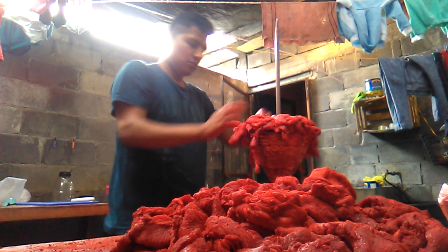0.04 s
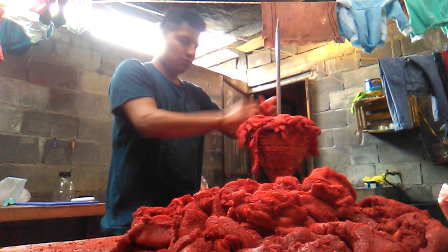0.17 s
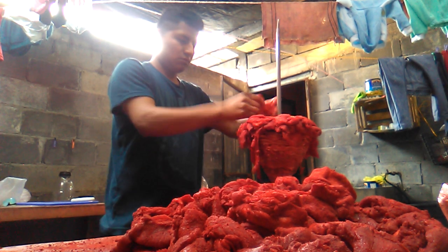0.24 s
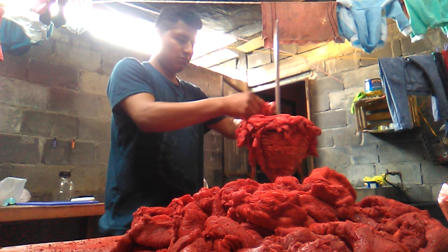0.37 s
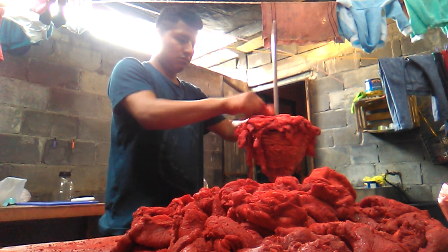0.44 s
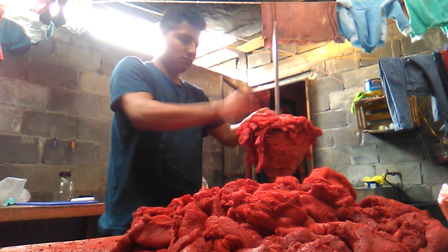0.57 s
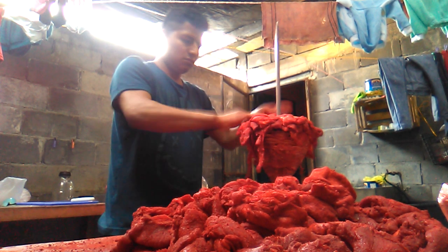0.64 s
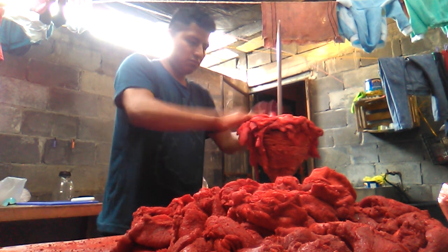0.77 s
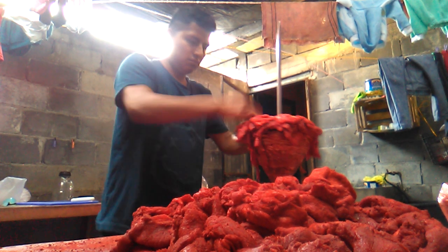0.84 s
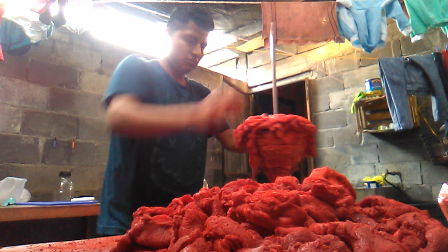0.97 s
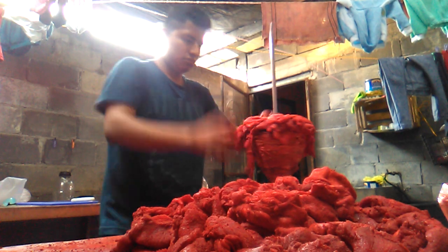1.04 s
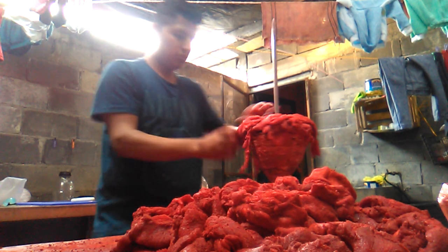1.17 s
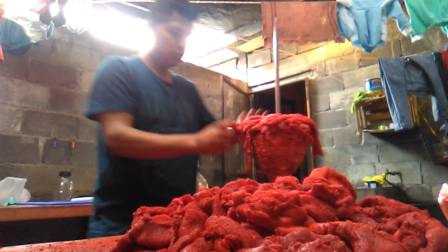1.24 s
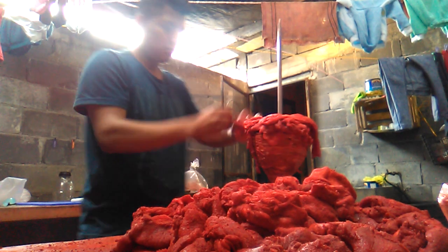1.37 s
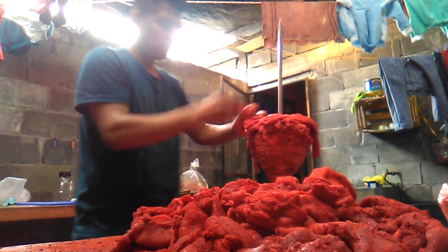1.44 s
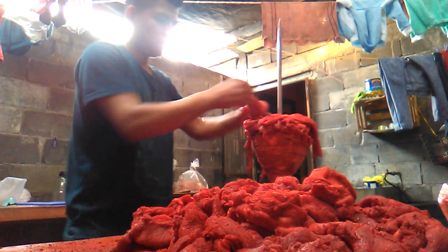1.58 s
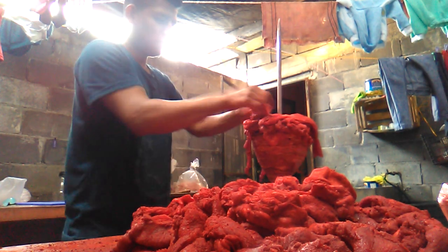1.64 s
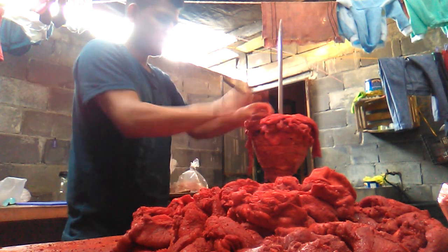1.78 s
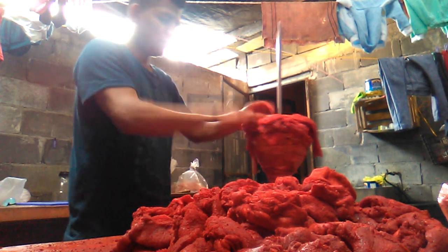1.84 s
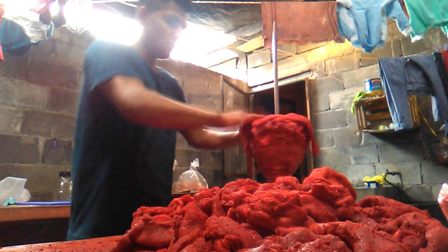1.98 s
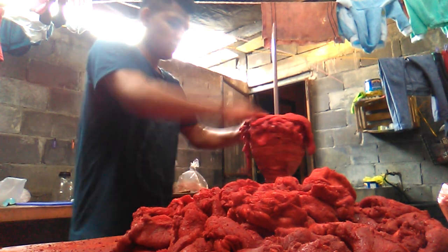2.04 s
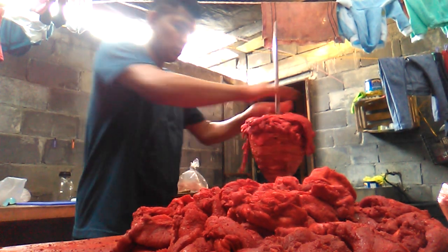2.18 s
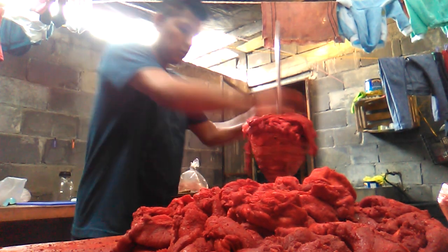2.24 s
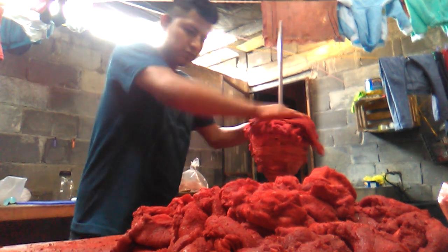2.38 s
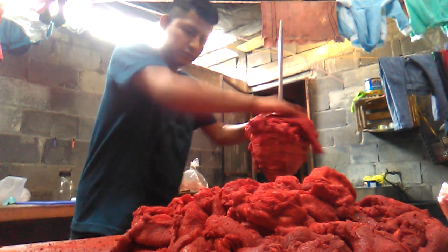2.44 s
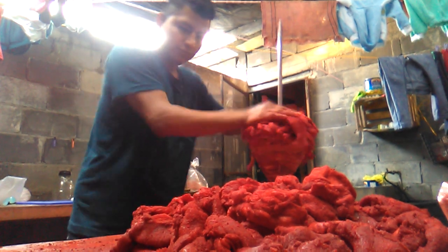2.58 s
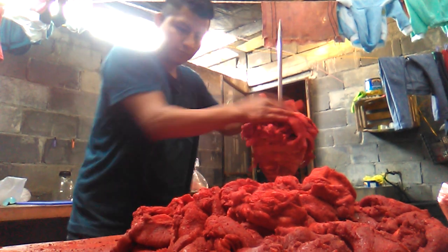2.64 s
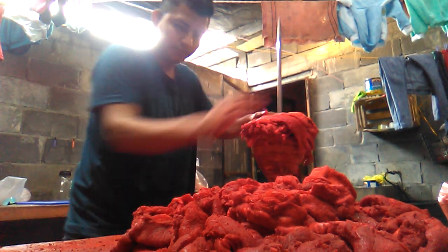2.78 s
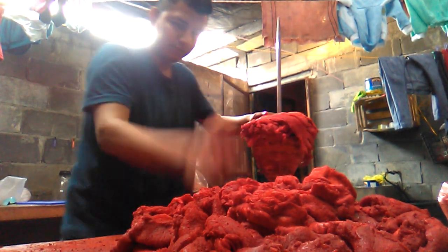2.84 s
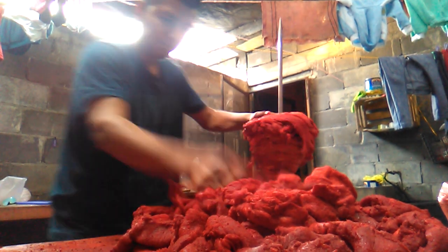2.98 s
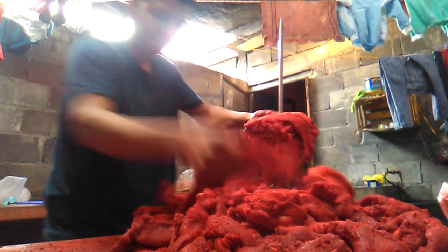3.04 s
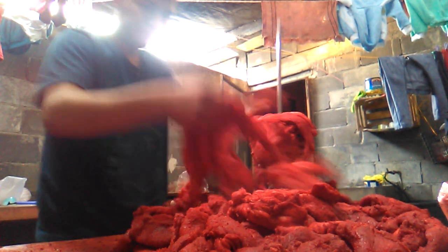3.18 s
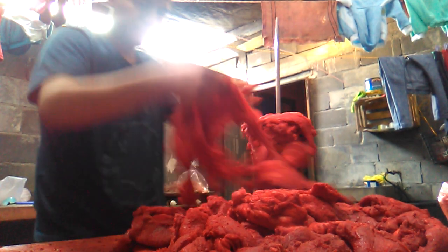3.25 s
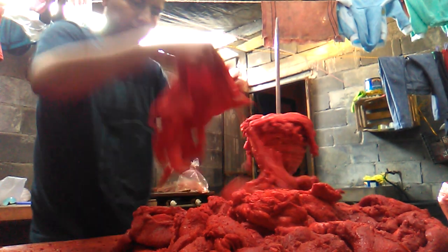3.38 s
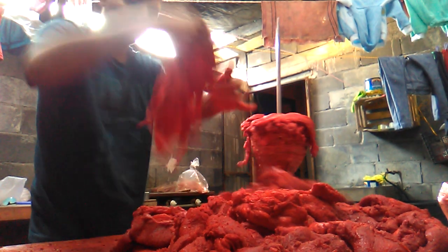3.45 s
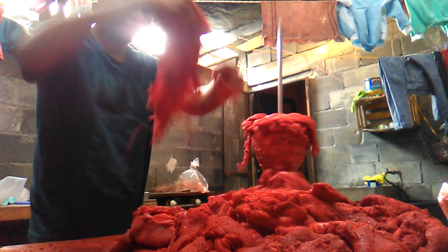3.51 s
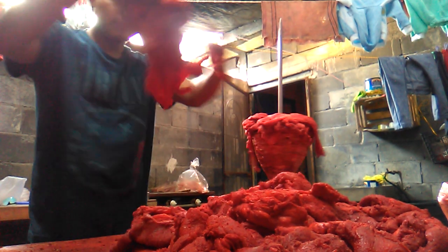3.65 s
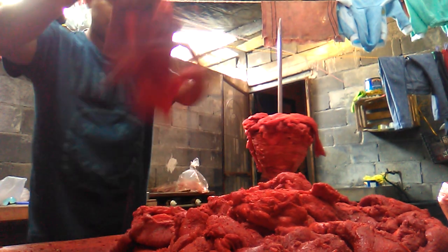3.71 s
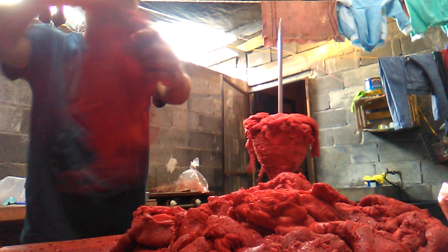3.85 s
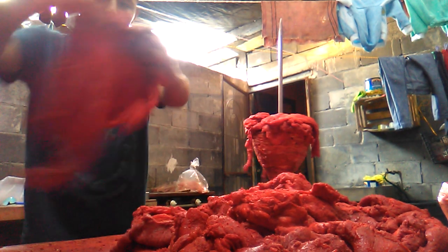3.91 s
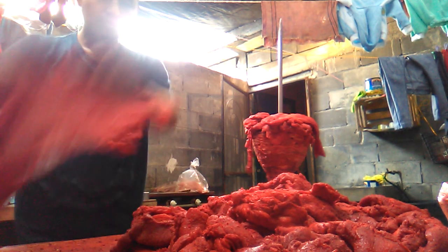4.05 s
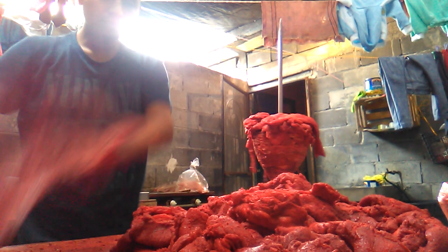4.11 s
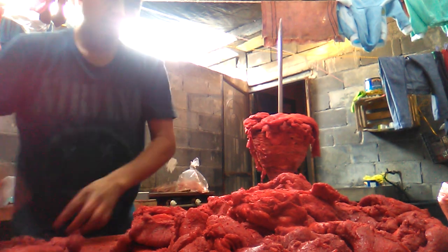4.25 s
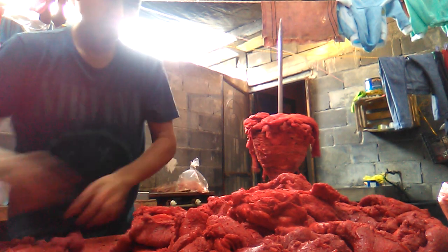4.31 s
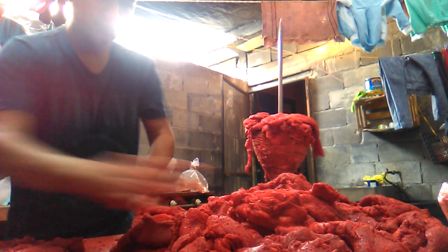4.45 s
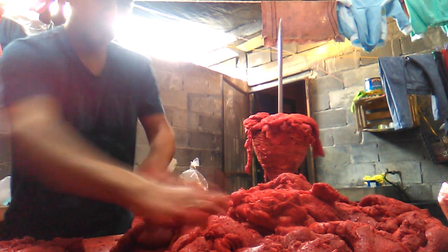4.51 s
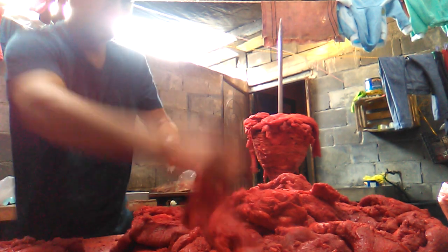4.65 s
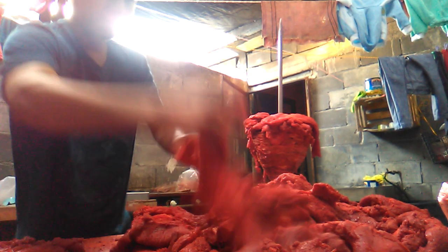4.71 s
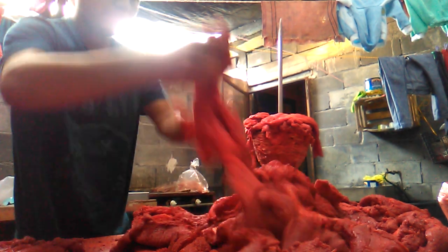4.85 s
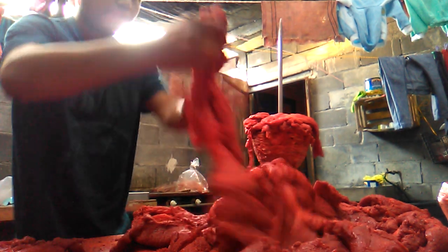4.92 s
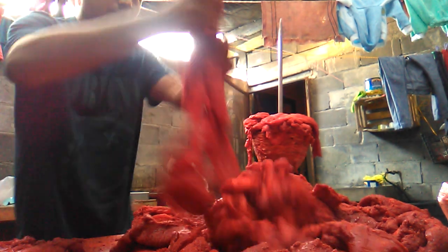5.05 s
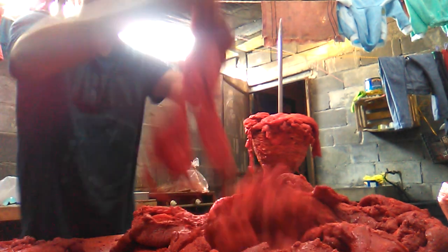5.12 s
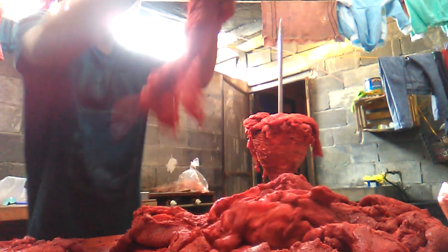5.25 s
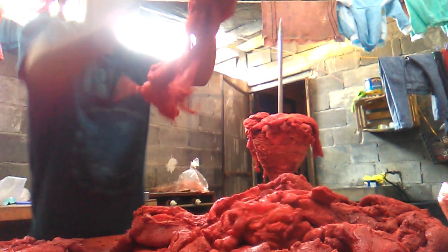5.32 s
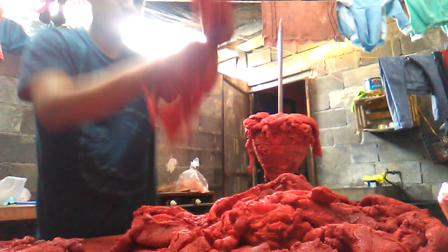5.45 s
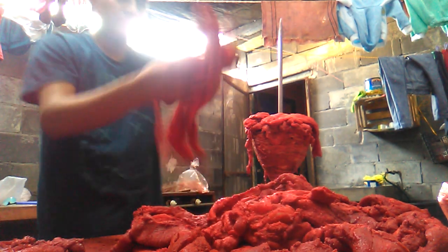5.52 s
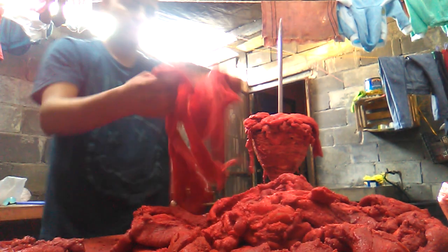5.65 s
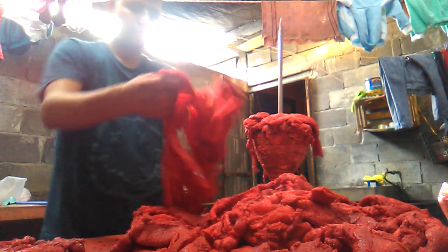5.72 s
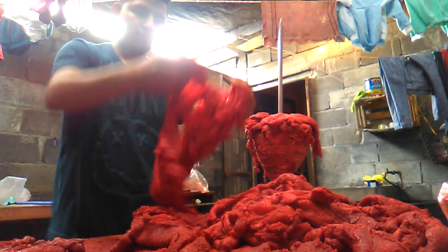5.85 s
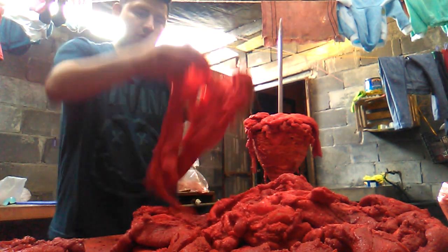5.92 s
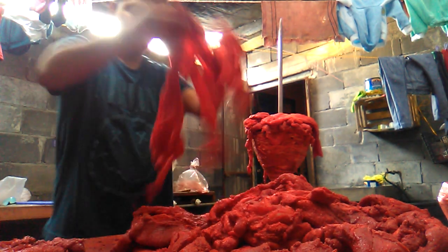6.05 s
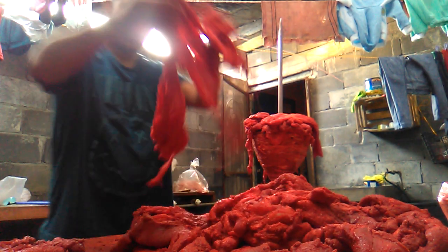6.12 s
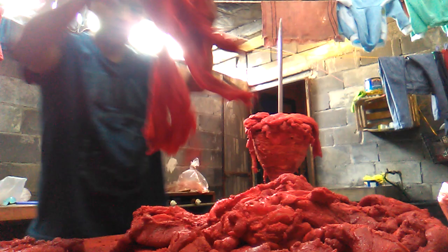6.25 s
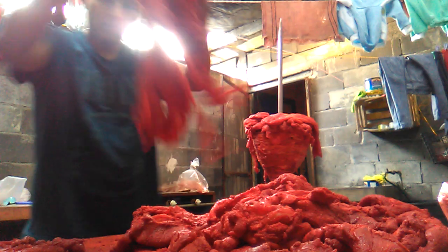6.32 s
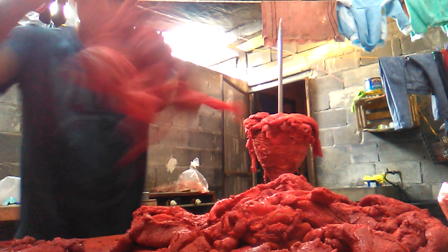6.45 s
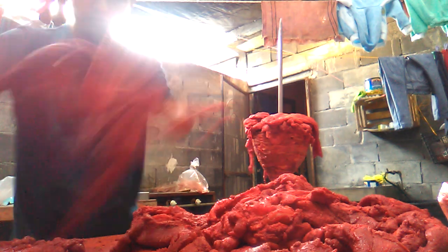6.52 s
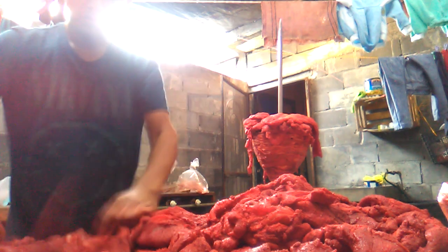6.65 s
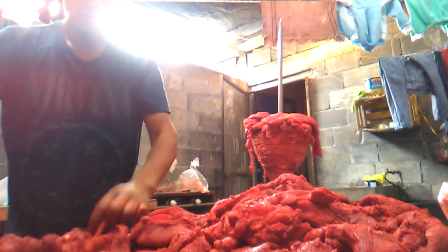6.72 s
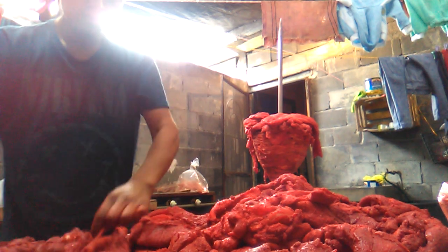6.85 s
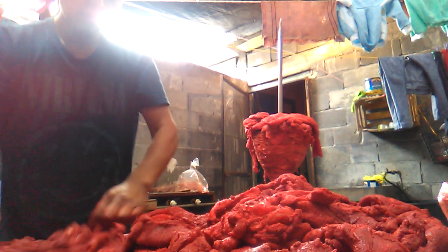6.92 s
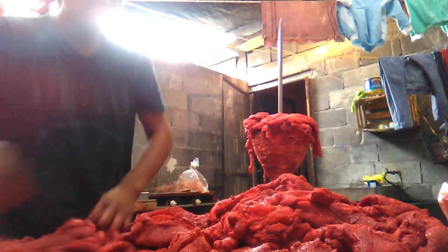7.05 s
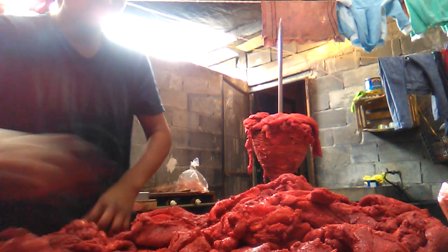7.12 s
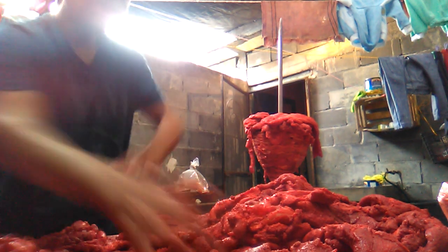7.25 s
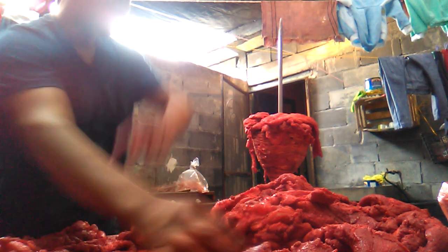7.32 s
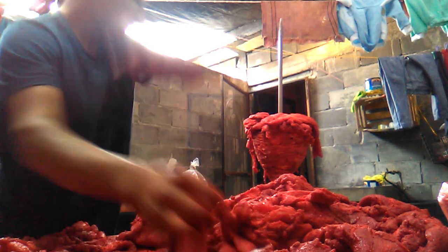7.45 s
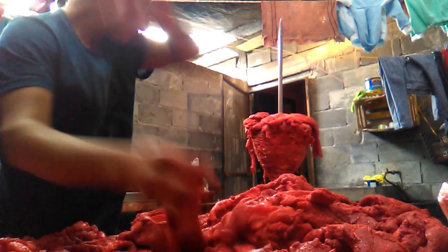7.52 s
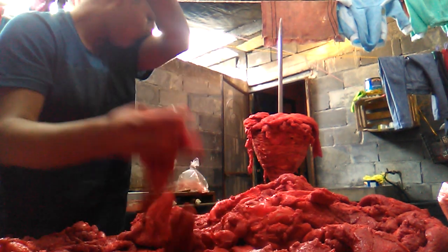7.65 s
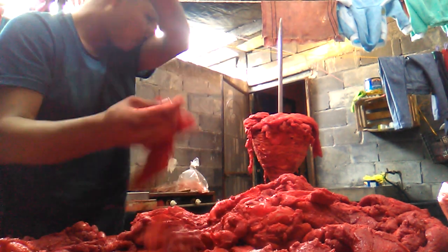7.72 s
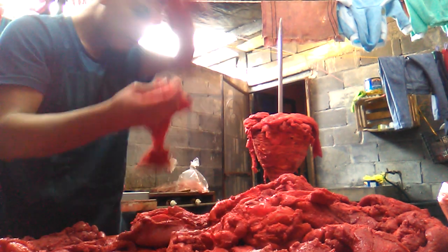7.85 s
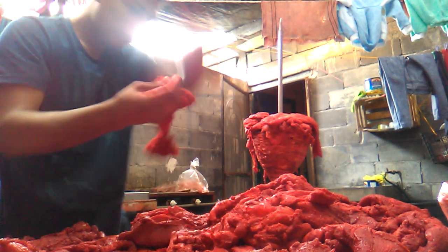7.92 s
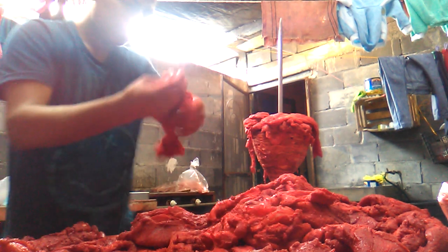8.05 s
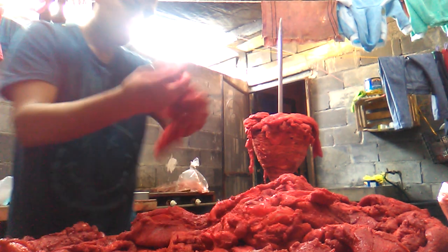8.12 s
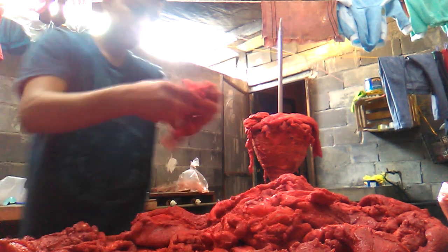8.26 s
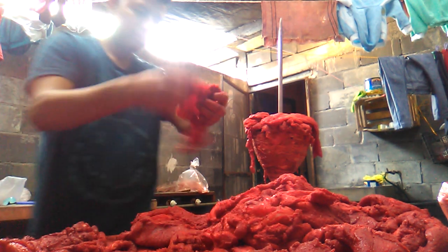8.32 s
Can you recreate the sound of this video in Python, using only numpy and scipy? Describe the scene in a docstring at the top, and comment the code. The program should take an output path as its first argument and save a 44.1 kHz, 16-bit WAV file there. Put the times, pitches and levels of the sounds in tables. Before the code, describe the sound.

Hands pat wet meat onto a metal spit, with one hollow smack, sticky peeling and two wet slaps in a small room.

```python
"""A small block-walled room where wet marinated meat is stacked on an upright spit.
Hands pat the stack, ringing the spit, and a cupped palm smacks it once with a hollow pop.
Slices peel crackling off a sticky heap; twice one is flung onto the table, forcing out air and juice.
Juice ticks and drips; a low outdoor rumble swells and sinks behind it all."""
import sys
import numpy as np
from scipy import signal
from scipy.fft import rfft, irfft
from scipy.io import wavfile

SR = 44100
rng = np.random.default_rng(int(sys.argv[2]) if len(sys.argv) > 2 else 0)


def persist_wave(psi):
    """Save psi, clipped to +-1, as 16-bit WAV."""
    counts = np.round(np.clip(psi, -1, 1) * 32767).astype(np.int16)
    wavfile.write(sys.argv[1], SR, np.atleast_2d(counts).T)


N = 369999
EDGE_HZ = 14350

# flung slices: t/s, loose-end lead/s, first end's splash/dB, step per end/dB, first fold gap/s,
# fold push/dB, push f/Hz, fold splash/dB, air pocket f/Hz, thud/dB, thud f/Hz, spatter/dB
SLAPS = [(4.2429, .0205, -43, -0.5, .0033, -12.5, 343.5, -22, 1320, -9.5, 131, -52),
         (6.691, 0.033, -37, -8, .0047, -10, 330, -27, 876, -21, 151, -49.5)]
# cupped palm: t/s, pop/dB, pop f/Hz, squirt/dB, squirt length/s
SMACK = [(2.327, -10, 472, -33, 0.002)]
# juice splash spectrum: f/Hz, level/dB
SPLASH = [(100, -14), (500, 5.5), (850, 1.5), (1300, 0.5), (1700, -1), (2500, -0.5), (3500, -5.5),
          (5500, -7), (7000, -13.5), (9000, -25.5), (14000, -38)]


def amp(db):
    """Decibels to gain."""
    return 10 ** (np.asarray(db) / 20)


def unit(x):
    """Scale to unit rms."""
    return x / np.sqrt(np.mean(x ** 2) + 1e-20)


def read(points, hz):
    """Interpolate a table over log frequency."""
    f, value = np.transpose(points)
    return np.interp(np.log(hz + 1), np.log(f), value)


def level(curve):
    """Gain per sample from (t/s, level/dB) points."""
    return amp(np.interp(np.arange(N) / SR, *np.transpose(curve)))


def swell(start_s, end_s, attack_s, release_s):
    """Gain that builds up to start_s, holds until end_s, then decays."""
    t = np.arange(N) / SR
    return np.exp(-np.maximum(start_s - t, 0) / attack_s - np.maximum(t - end_s, 0) / release_s)


def add(mix, at_s, sound):
    """Mix a sound in at a time."""
    part = mix[max(round(at_s * SR), 0):][:len(sound)]
    part += sound[:len(part)]


def colour(x, spectrum, size=4096):
    """Minimum-phase filter of unit energy with the given spectrum."""
    log_gain = np.log(amp(read(spectrum, abs(np.fft.fftfreq(size, 1 / SR)))))
    response = np.exp(np.conj(signal.hilbert(log_gain)))
    taps = np.fft.ifft(response).real[:size // 2]
    return signal.oaconvolve(x, taps / np.linalg.norm(taps))[:len(x)]


def drift(rate_hz):
    """Slow random wander, unit rms."""
    frames = N // 128 + 2
    f = np.fft.rfftfreq(frames, N / frames / SR)
    spectrum = rfft(rng.standard_normal(frames)) * np.exp(-(f / rate_hz) ** 2)
    return np.interp(np.arange(N), np.linspace(0, N, frames), unit(irfft(spectrum, frames)))


def grains(per_s, spread_db):
    """Random clicks, most small, a few large."""
    place, size, sign = rng.random((round(per_s * N / SR), 3)).T
    height = amp(spread_db * np.minimum(-np.log(1 - size), 4)) * np.sign(sign - .5)
    return unit(np.bincount((place * N).astype(int), height, N))


def push(hz, cycles):
    """Air displaced by a soft blow: a fast-decaying sine."""
    turns = hz * np.arange(SR // 8) / SR
    return np.sin(2 * np.pi * turns) * np.exp(-turns / cycles)


def spray(length_s):
    """Juice forced from a closing gap: a noise burst."""
    age = np.arange(SR // 8) / SR / length_s
    shape = 2 * age * np.exp(1 - 2 * age)
    return unit(rng.standard_normal(len(age)) * shape) * np.sqrt(np.mean(shape ** 2))


def slaps(cycles=.6, spray_s=.002, rush_hz=330, flap_hz=284, pocket_db=-2.5):
    """Loose ends touch first, the slice lands fold by fold, its weight thuds. Returns body, juice."""
    body, juice = np.zeros(N), np.zeros(N)
    slither = grains(per_s=3000, spread_db=1.5)
    rush = unit(signal.lfilter(*signal.butter(2, rush_hz, fs=SR), slither))
    for (s, lead_s, flap_splash_db, flap_step_db, gap_s, push_db, push_hz,
         splash_db, pocket_hz, thud_db, thud_hz, _) in SLAPS:
        # the hanging end slithers down, shoving air ahead
        approach = swell(s, s, .72 * lead_s, spray_s)
        body += amp(-32) * rush * approach
        juice += amp(-49.5) * slither * approach
        for k in range(3):  # each loose end heavier and lower, its splash longer
            touch_s = s - lead_s * (1 - k / 3)
            add(body, touch_s, amp(-31.5 + 4 * k) * push(flap_hz * .7 ** k, cycles))
            add(juice, touch_s, amp(flap_splash_db + k * flap_step_db) * spray(.00079 * 1.8 ** k))
        folds_s = s + gap_s * np.array([0, 1, 1.5])
        for fold_s, wet_db in zip(folds_s, (0, 4, 0)):
            add(body, fold_s, amp(push_db) * push(push_hz, cycles))
            add(juice, fold_s, amp(splash_db + wet_db) * spray(spray_s))
        # air trapped under the middle fold rings
        add(juice, folds_s[1], amp(splash_db + pocket_db) * push(pocket_hz, cycles=3.8))
        add(body, folds_s[-1], amp(thud_db) * push(thud_hz, cycles=.53))
    return body, colour(juice, SPLASH)


def smack(cavity_hz=(190, 780)):
    """A cupped palm traps air on the stack and squirts it out. Returns hollow pop, bright squirt."""
    # squirt spectrum: f/Hz, level/dB
    squirt_spectrum = [(500, 1), (1220, 1.5), (1600, -4.5), (2200, -27), (3000, -2.5), (3500, -13),
                       (4400, 1), (5200, 4.5), (5700, -11), (6100, -5.5), (7200, -19), (8700, -21),
                       (9700, -14), (14000, -41)]
    pop, juice = np.zeros(N), np.zeros(N)
    cavity = signal.butter(3, cavity_hz, "bandpass", fs=SR, output="sos")
    for s, pop_db, hz, squirt_db, length_s in SMACK:
        air = signal.sosfilt(cavity, push(hz, cycles=.68))
        add(pop, s - .001, amp(pop_db) * air)  # air leaves before the juice
        add(juice, s, amp(squirt_db) * spray(length_s))
    return pop, colour(juice, squirt_spectrum)


def pats(rise_s=.00064, thud_db=-1, wet_db=-19, wet_s=.0058, wet_top_hz=4200, detune=.032, spot_db=2.5):
    """Fingers thud on the meat and ring the spit, a little differently at each spot."""
    # finger blows: t/s, level/dB, tilt/(dB/octave), thud f/Hz
    blows = [(0.441, -48.5, -3.5, 243), (0.497, -49, -3.5, 400), (0.8467, -36.5, -0.5, 442),
             (0.985, -50.5, -2.5, 303), (1.187, -38, -2, 450), (1.348, -38, -0.5, 270),
             (1.855, -45.5, -2.5, 650), (1.9801, -45.5, -1, 1150), (2.0488, -32.5, 1, 315),
             (2.295, -40.5, -3.5, 390), (2.765, -34.5, -1, 393), (2.960, -41.5, -4.5, 372),
             (3.5602, -40.5, -4.5, 305), (6.937, -46.5, -8, 205)]
    # modes of the loaded spit and stand: f/Hz, level/dB, t60/s
    spit_modes = [(118, -8.5, 0.1), (184, 2, 0.025), (257, -11, 0.041), (409, -6, 0.064),
                  (495, -6.5, 0.079), (649, -11.5, 0.064), (890, -11, 0.032), (1082, -11, 0.024),
                  (1270, -37, 0.05), (1575, -25, 0.029), (1576, -15.5, 0.04), (2240, -29, 0.095),
                  (2490, -24, 0.056), (2600, -36, 0.043), (3210, -26, 0.06), (3275, -27.5, .05),
                  (3570, -60, .05)]
    hz, db, t60_s = np.transpose(spit_modes)[:, :, None]
    t = np.arange(SR // 8) / SR
    attack = 1 - np.exp(-t / rise_s)
    body, juice = np.zeros(N), np.zeros(N)
    for s, pat_db, tilt_db, thud_hz in blows:
        load, spot, phase = rng.standard_normal((3, len(spit_modes), 1))
        gain = amp(db + tilt_db * np.log2(hz / 400) + spot_db * np.tanh(spot) - 60 * t / t60_s)
        ring = (gain * np.sin(2 * np.pi * (hz * (1 + detune * load) * t + phase))).sum(0)
        thud = amp(thud_db) * push(thud_hz, cycles=1.76)
        add(body, s, amp(pat_db) * (ring + thud) * attack)
        add(juice, s - .001, amp(pat_db + wet_db + 2 * tilt_db) * spray(wet_s))  # wet film is met first
    muffled = signal.lfilter(*signal.butter(2, wet_top_hz, fs=SR), juice)  # hand covers the spot
    return body + colour(muffled, SPLASH)


def spatter(flight_s=.008, smack_db=-57):
    """Thrown droplets rain back after each slap and smack."""
    # droplet spectrum: f/Hz, level/dB
    droplet_spectrum = [(300, -2), (900, 2.5), (1600, 6), (2500, 1), (5500, -3), (7500, -9.5), (10000, -16),
                        (14000, -22)]
    landings = [(s + flight_s, db) for s, *_, db in SLAPS]
    landings += [(s + flight_s, smack_db) for s, *_ in SMACK]
    shower = sum(amp(db) * swell(s, s, attack_s=.002, release_s=.033) for s, db in landings)
    return shower * unit(colour(grains(per_s=8700, spread_db=1.5), droplet_spectrum))


def ticks(length_s=.0012, spread=1.33):
    """Sticky film snaps and juice drips: tiny band-passed bursts."""
    # snaps and drips: t/s, peak/dB, nominal f/Hz
    snaps = [(1.85, -56, 5230), (2.004, -46.5, 4760), (2.545, -52, 4740), (2.741, -52.5, 4200),
             (3.318, -48.5, 4540), (3.718, -52.5, 1630), (3.766, -57.5, 1600), (3.952, -54, 1300),
             (4.044, -57.5, 4050), (4.655, -51, 5100), (5.602, -46.5, 5030), (5.735, -58, 5360),
             (7.457, -50.5, 4600)]
    out = np.zeros(N)
    for s, db, hz in snaps:
        band = signal.butter(2, [hz / spread ** 2, hz * spread], "bandpass", fs=SR)
        snap = signal.lfilter(*band, signal.lfilter(*band, spray(length_s)))
        add(out, s, amp(db) * snap / abs(snap).max())
    return out


def peeling(gain_db=-3.5, clump_db=3, snap_db=-9, sticky_db=-84.5):
    """Wet films of different sizes peel in clumps; now and then a larger one snaps."""
    # pulls on wet surfaces: parting t/s, relative level/dB, build/s, fade/s
    pulls = [(0.93, -78, .06, 0.48), (2.1, -76.5, 0.18, 0.22), (2.46, -72, 0.18, 0.21),
             (3.24, -68, 0.18, 0.14), (4.655, -66, 0.058, 0.035), (4.86, -70, .06, 0.37),
             (5.5, -69, .03, 0.05), (5.63, -70.5, 0.038, 0.15), (7.37, -69, .025, .06),
             (7.48, -65.5, 0.088, 0.21)]
    # crackle spectrum: f/Hz, level/dB
    peel_spectrum = [(1000, -20), (2500, -10), (3600, -3.5), (4700, -1), (6200, -3.5), (8200, -12.5),
                     (10300, -10), (14000, -17.5)]
    edges_hz = np.geomspace(1500, EDGE_HZ, 7)
    films = np.zeros(N)
    for band_hz in zip(edges_hz, edges_hz[1:]):
        clumps = grains(per_s=630, spread_db=.5) * amp(clump_db * drift(rate_hz=33))
        films += signal.lfilter(*signal.butter(2, band_hz, "bandpass", fs=SR), clumps)
    snaps = signal.oaconvolve(grains(per_s=38, spread_db=3), spray(length_s=.00069))[:N]
    crackle = unit(colour(unit(films) + amp(snap_db) * unit(snaps), peel_spectrum))
    power = sum((amp(db) * swell(s, s, build_s, fade_s)) ** 2 for s, db, build_s, fade_s in pulls)
    power += amp(sticky_db) ** 2  # wet hands never quite stop crackling
    return amp(gain_db) * np.sqrt(power) * crackle


def wiping(gain_db=-6, light_db=-13, press_s=.18):
    """A slice smoothed along the wet table hisses, louder with pressure, until the hand lifts."""
    # strokes: start/s, end/s, relative level/dB
    strokes = [(6.747, 7.13, -62)]
    # sliding spectrum: f/Hz, level/dB
    wipe_spectrum = [(400, -9.5), (1000, 0), (1800, -1.5), (3200, -5), (5000, -3.5), (6800, -9.5),
                     (9000, -18.5), (14000, -26.5)]
    friction = grains(per_s=5500, spread_db=3) * amp(1.3 * drift(rate_hz=25))
    pressure = np.zeros(N)
    for start_s, end_s, db in strokes:
        contact = swell(start_s, end_s, attack_s=.08, release_s=.027)
        pressure += contact * level([(start_s, db + light_db), (start_s + press_s, db)])
    return amp(gain_db) * pressure * unit(colour(friction, wipe_spectrum))


def swish(spread=1.6):
    """A slice swings through the air with a short soft rush."""
    # swings: t/s, level/dB, f/Hz, half-width/s
    swings = [(6.527, -69.5, 2100, 0.035)]
    out, t = np.zeros(N), np.arange(N) / SR
    for s, db, hz, half_width_s in swings:
        band = signal.butter(2, [hz / spread, hz * spread], "bandpass", fs=SR)
        rush = unit(signal.lfilter(*band, rng.standard_normal(N)))
        out += amp(db) * rush / (1 + ((t - s) / half_width_s) ** 2)
    return out


def background(air_db=-60.5, rumble_db=-58):
    """Still air, a lumpy rumble and the street's drone beyond the walls."""
    # air, rumble and street spectra: f/Hz, level/dB
    air_spectrum = [(15, -39.5), (25, -9.5), (54, -4), (85, 0), (177, -10.5), (318, -12), (372, -16),
                    (584, -19.5), (741, -22), (1050, -25.5), (1260, -28), (2380, -36.5), (4850, -41),
                    (8690, -47), (14000, -48.5)]
    rumble_spectrum = [(30, -28.5), (48, -14.5), (62, 0), (72, 3), (85, -5), (102, -14), (124, -4.5),
                       (170, -19), (300, -35), (2000, -89)]
    street_spectrum = [(40, -28), (100, -9.5), (200, -2), (255, -5), (310, 2.5), (360, -1.5), (420, 1.5),
                       (480, -2), (570, -3.5), (700, -10.5), (1000, -15.5), (1600, -30.5), (3000, -41.5),
                       (10000, -65.5)]
    # street drone envelope: t/s, level/dB
    street_envelope = [(0.0, -72.5), (1.07, -65), (1.73, -74), (2.29, -64.5), (3.2, -67.5), (3.62, -63.5),
                       (5.44, -64), (6.29, -58.5), (6.54, -60.5), (6.85, -57), (7.15, -62.5), (7.48, -66),
                       (8.39, -63)]
    air, rumble, street = (unit(colour(rng.standard_normal(N), spectrum))
                           for spectrum in (air_spectrum, rumble_spectrum, street_spectrum))
    rumble *= amp(rumble_db + 1.1 * drift(rate_hz=5.4))
    street *= level(street_envelope) * amp(.94 * drift(rate_hz=17))
    return amp(air_db) * air + rumble + street


def room(x, build_s=.007, tail_db=-10.5, taps_per_s=4000):
    """A few near reflections and a short tail that decays by band."""
    # room decay: f/Hz, t60/s
    decay = [(100, 0.31), (400, 0.18), (1200, 0.28), (3000, .27), (5500, 0.22), (9000, 0.04), (14000, .12)]
    # echoes off table, walls and roof: delay/s, level/dB
    echoes = [(.0085, -16), (0.0128, -20), (0.016, -18.5), (.021, -27)]
    taps = rng.standard_normal(SR // 2) * (rng.random(SR // 2) < taps_per_s / SR)
    hz, t, bands = signal.stft(taps, SR, nperseg=256)
    bands = bands * amp(-60 * t / read(decay, hz)[:, None])
    tail = signal.istft(bands, SR, nperseg=256)[1]
    tail *= 1 - np.exp(-(np.arange(len(tail)) / SR / build_s) ** 2)
    tail *= amp(tail_db) / np.linalg.norm(tail)
    for delay_s, db in echoes:
        add(tail, delay_s, amp(db) * signal.windows.hann(7) / 3)
    return signal.fftconvolve(x, tail)[:N]


def diffuse(x, turn_hz=130):
    """Feed two room tails in turn, so a splash decays smoothly."""
    angle = 2 * np.pi * turn_hz * np.arange(N) / SR
    return room(x * np.cos(angle)) + room(x * np.sin(angle))


def scene():
    """Mono mix: table near the microphone, spit farther off with more of the room."""
    thump, splash = slaps()
    pop, squirt = smack()
    snaps = ticks()
    far = pats() + peeling() + wiping() + swish()
    walls = room(amp(-4) * thump + amp(-2.5) * (pop + snaps) + amp(1) * far)
    walls += diffuse(amp(-9) * splash + amp(-2) * squirt)
    direct = thump + splash + spatter() + pop + squirt + far + snaps
    return (direct + walls + background())[None]


def record(dry, low_hz=49.88):
    """Small microphone: deep bass lost, treble cut at EDGE_HZ."""
    thin = signal.sosfilt(signal.butter(4, low_hz, "highpass", fs=SR, output="sos"), dry)
    lowpass = signal.firwin(511, EDGE_HZ, window=("kaiser", 8), fs=SR)
    return signal.oaconvolve(thin, lowpass[None], "same")


dry = scene()
out = record(dry)
persist_wave(out)
```